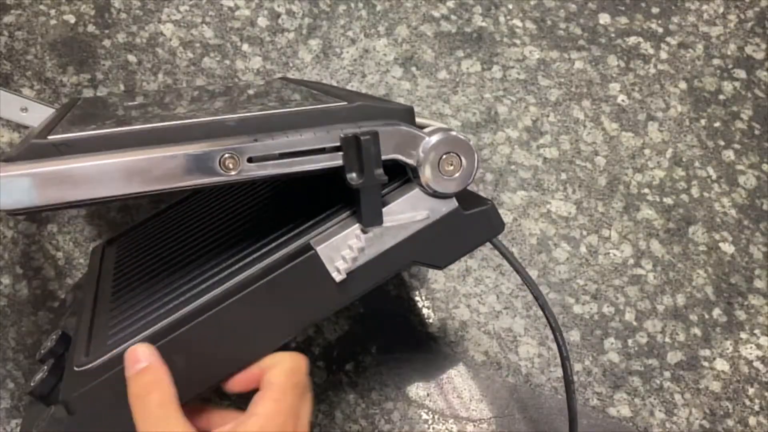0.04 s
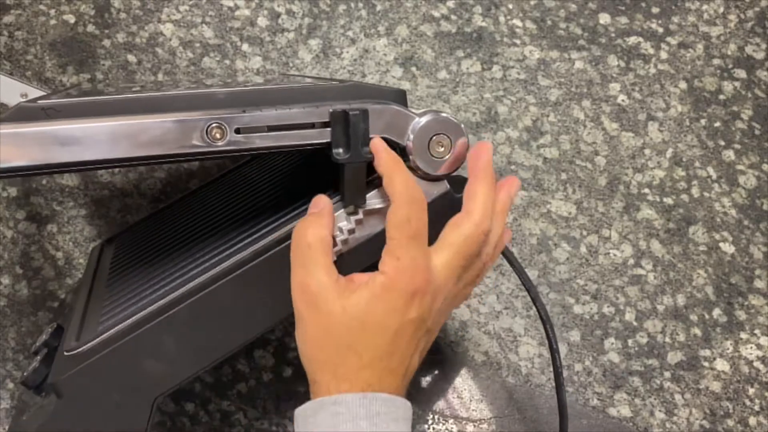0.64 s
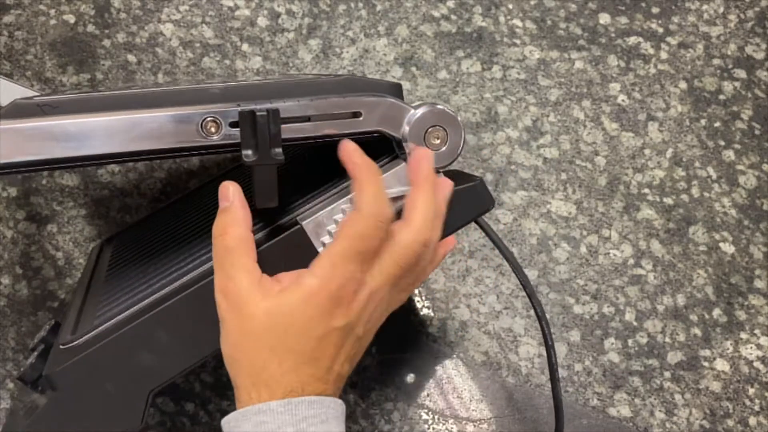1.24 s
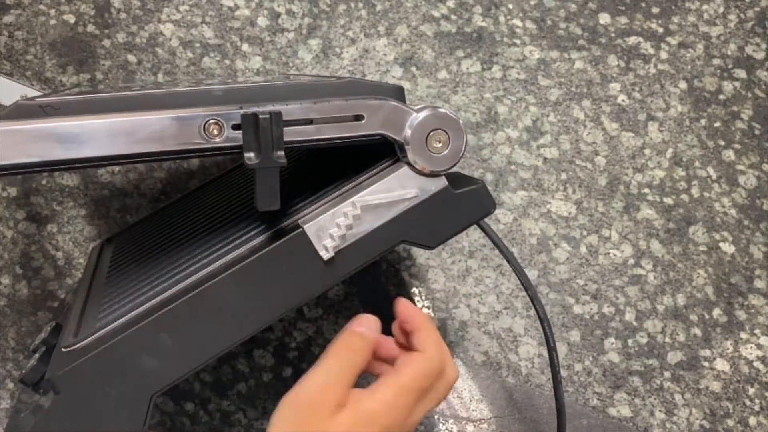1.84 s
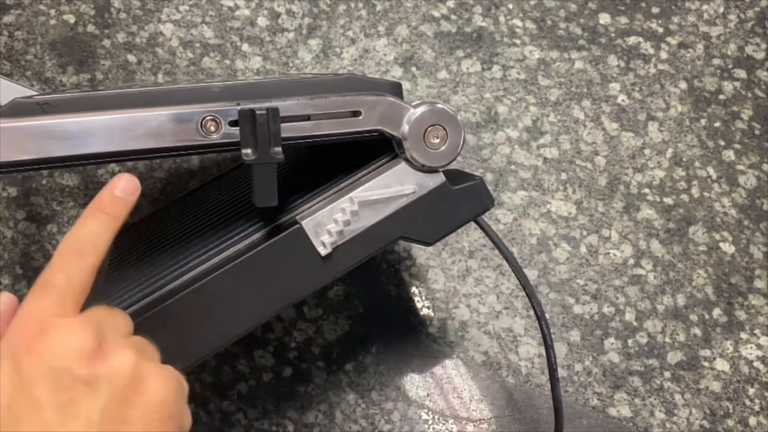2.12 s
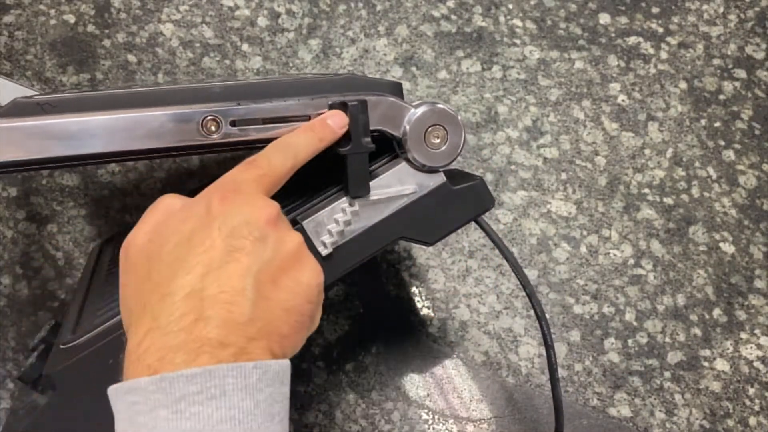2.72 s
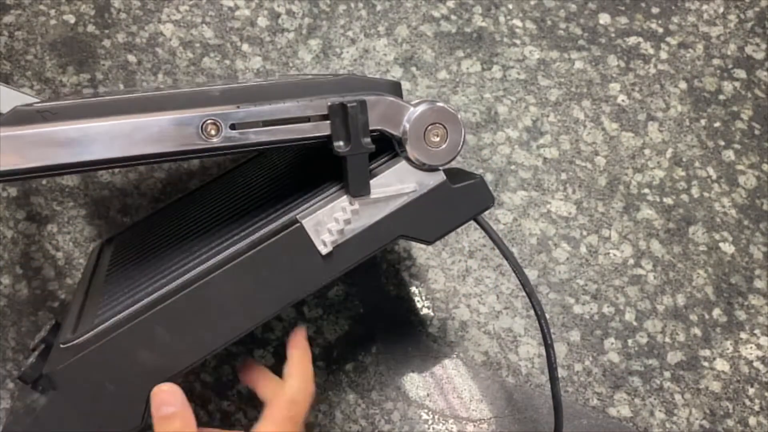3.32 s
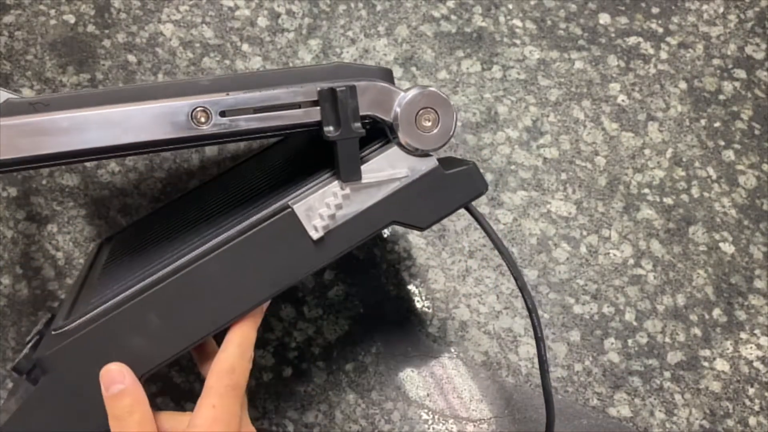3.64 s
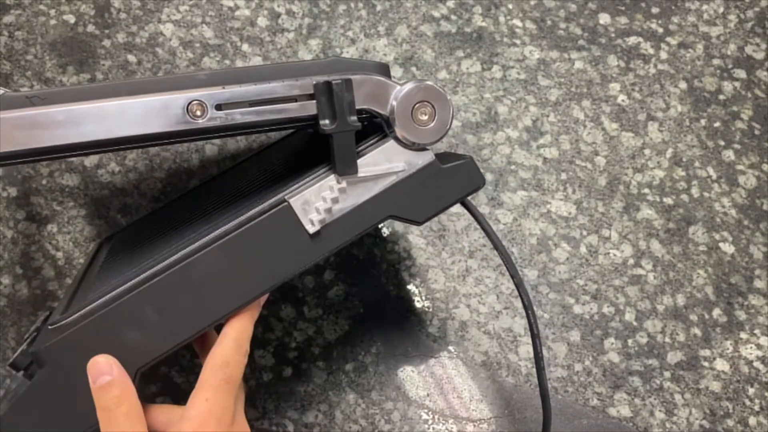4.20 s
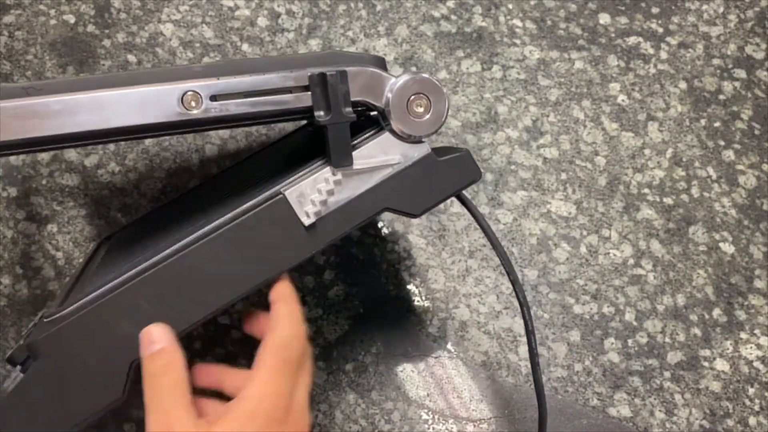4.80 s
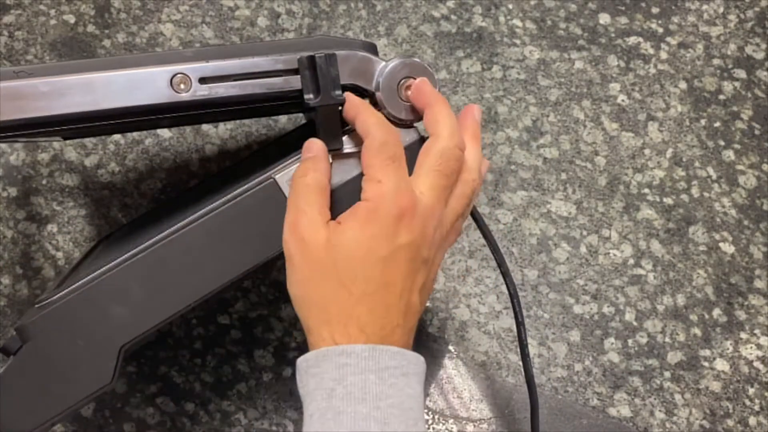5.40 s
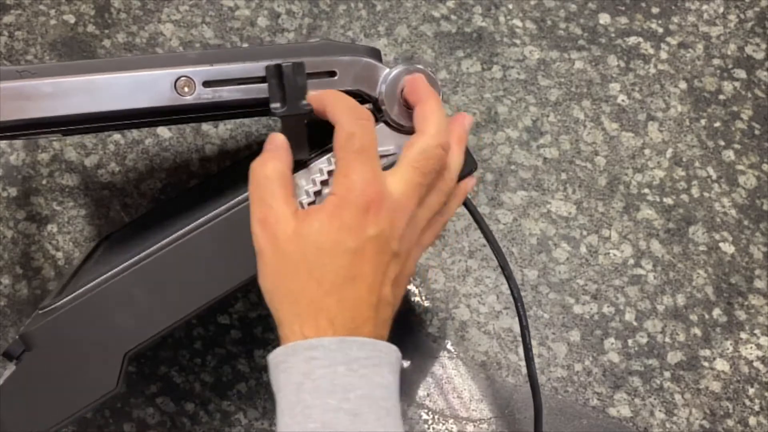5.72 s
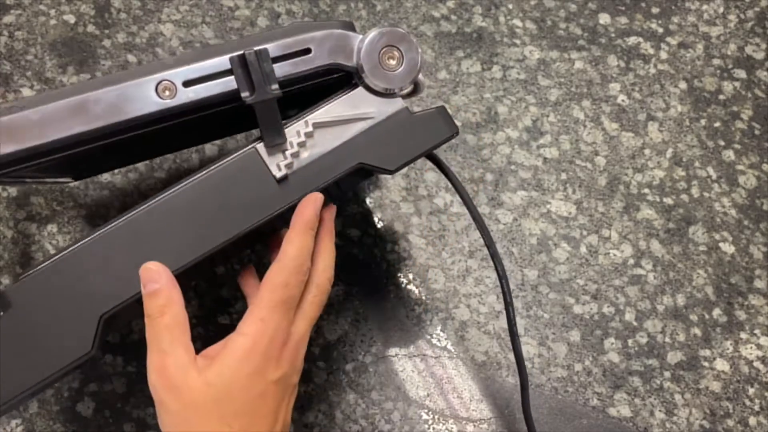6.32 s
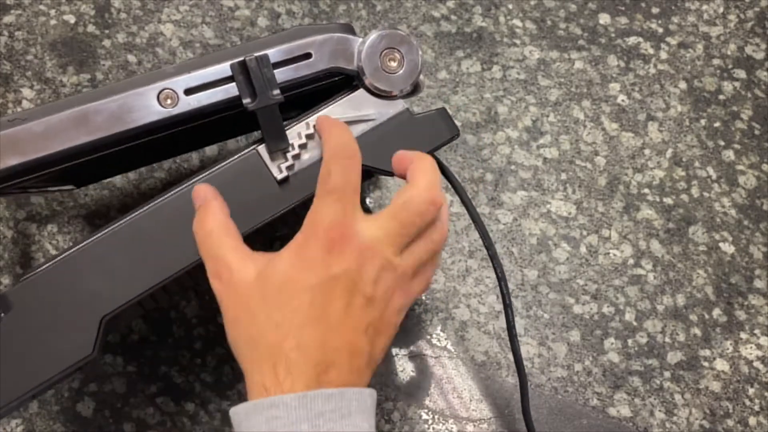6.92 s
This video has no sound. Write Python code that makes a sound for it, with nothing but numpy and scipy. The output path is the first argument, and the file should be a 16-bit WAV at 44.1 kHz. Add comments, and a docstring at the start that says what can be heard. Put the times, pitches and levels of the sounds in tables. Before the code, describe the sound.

A plastic latch slides along the notched metal arm of a countertop grill, giving three quick bursts of bright, snapping clicks, each with a brief metallic ring and hollow thud. The second burst ends in a firm knock; the third is shortest. Between them, fingers rub and tap the case and the grill bumps softly on its feet. The microphone is close, in a small kitchen with a low rumble.

```python
"""Grill latch on a kitchen countertop

Close to a two-port microphone, a plastic latch slides to and fro along the notched metal arm of a
contact grill standing on stone. Each notch gives a bright snap, the arm and the housing ring after it,
and the small kitchen answers. Fingers knock, scuff and rub on the case and the grill thuds softly on
its feet, over a low steady rumble."""
import sys
import numpy as np
from scipy import signal
from scipy.fft import rfft, irfft, next_fast_len
from scipy.io import wavfile
from scipy.ndimage import uniform_filter1d

SR = 44100
rng = np.random.default_rng(int(sys.argv[2]) if len(sys.argv) > 2 else 0)


def output_pcm(signal):
    """Save a mono or channel-first signal as 16-bit PCM at the path in sys.argv[1].

    Samples are clipped to [-1, 1] before scaling.
    """
    pcm = np.clip(np.atleast_2d(signal).T, -1, 1) * 32767
    wavfile.write(sys.argv[1], SR, np.round(pcm).astype(np.int16))


N = 306495
RING = SR // 2  # samples allowed for one ring or stroke
TOP_HZ = 16500  # upper edge of the microphone's band

# spectrum of the pawl's snap: f/Hz, relative level/dB
SNAP_COLOUR = [(600, -34), (3300, -12), (4900, -8.5), (6600, -8.5), (8500, -0.5), (10200, 0.5), (11000, -5),
               (11600, 0.5), (13500, -8), (15500, -6.5), (17000, -52)]
# spectrum of a thud in the hollow housing: f/Hz, relative level/dB
HOUSING_COLOUR = [(120, -47.5), (250, -3.5), (400, 5.5), (650, -5.5), (900, -2.5), (1400, -14),
                  (3000, -73.5)]
# clear modes of the housing: f/Hz, relative level/dB, unscaled t60/s
HOUSING_MODES = [(262, -6, .2), (313, -1, .24), (339, -2, .3), (472, -4, .18), (567, -6, .16),
                 (873, -6, .16), (1028, -7, .16)]


def latch():
    """The pawl snaps off a tooth and rattles, shaking the arm and then the housing."""
    # notches passed: t/s, snap level/dB, arm base level/dB
    notches = [(0.6652, -8, -26), (0.6953, -11.5, -22), (0.7301, -16, -29), (0.7778, -16.5, -22.5),
               (0.8285, -16.5, -27.5), (0.877, -18, -28.5), (2.3683, -13, -28), (2.4056, -16.5, -27),
               (2.443, -15.5, -27), (2.4854, -13.5, -29), (2.5295, -14.5, -25), (2.5835, -15.5, -21.5),
               (2.5902, -12, -19), (5.5785, -9.5, -29), (5.6098, -7.5, -22.5), (5.649, -18, -37),
               (6.9434, -44, -26)]
    # spectrum of the struck metal arm: f/Hz, relative level/dB
    arm_colour = [(600, -1), (1400, -4.5), (1700, -0.5), (2400, 4.5), (3700, 1), (4800, -1.5), (7000, -4),
                  (12000, -14.5), (16000, -30)]
    # clear modes of arm and lid: f/Hz, relative level/dB, unscaled t60/s
    arm_modes = [(1345, -4, .15), (1605, -6, .22), (1968, -6, .18), (2121, -6, .18), (2470, -6, .2),
                 (3484, -12, .14), (6530, -9, .3)]
    times, snap_db, arm_db = np.transpose(notches)
    housing_db = -30.5 + 0.24 * (arm_db - arm_db.mean())  # a harder hit thuds a little more
    snap = burst(times, snap_db, SNAP_COLOUR, rise_s=0.0004, t60_s=0.016)
    arm = burst(times, arm_db + 2, arm_colour, rise_s=0.0007, t60_s=0.073)
    arm_ring = ring(times, arm_db - 11, arm_modes, contact_hz=9000, t60_scale=0.38)
    housing = burst(times, housing_db, HOUSING_COLOUR, rise_s=0.008, t60_s=0.09)
    housing_ring = ring(times, housing_db - 7, HOUSING_MODES, contact_hz=3000, t60_scale=0.68)
    return snap + rattle(times, snap_db) + bending_waves(arm + arm_ring + housing + housing_ring)


def rattle(times, levels, count=4, within_s=0.017, spread_db=1.5):
    """The pawl chatters on the next tooth a few times after each snap."""
    bounces = times[:, None] + within_s * rng.random((len(times), count))
    db = levels[:, None] - 15 - spread_db * rng.uniform(-1, 1, bounces.shape)
    return burst(bounces.ravel(), db.ravel(), SNAP_COLOUR, rise_s=0.00016, t60_s=0.009)


def bending_waves(x, travel_1khz_s=0.0045):
    """Bending waves speed up with the root of frequency, so a click's lows arrive after its treble."""
    size = next_fast_len(N + RING)
    hz = np.fft.rfftfreq(size, 1 / SR)
    turns = travel_1khz_s * (2 * np.sqrt(1000 * hz) - hz * np.sqrt(1000 / TOP_HZ))  # no lag at TOP_HZ
    return irfft(rfft(x, size) * np.exp(-2j * np.pi * turns), size)[:, :N]


def knocks():
    """Fingers, loose parts and the latch at its end stops strike the shell, dull and hollow."""
    # blunt contacts: t/s, centre f/Hz, shell base level/dB, housing level/dB
    blows = [(0.5547, 600, -31, -39), (0.634, 760, -30.5, -38), (0.643, 450, -41.5, -36),
             (0.8787, 1000, -26.5, -40.5), (1.073, 1150, -26, -44.5), (2.286, 900, -25.5, -38.5),
             (2.5795, 2300, -18.5, -41), (2.593, 1550, -16.5, -24), (2.602, 540, -27.5, -32.5),
             (3.064, 1150, -38.5, -69), (4.656, 330, -54.5, -40), (5.198, 600, -57, -41),
             (5.551, 734, -24.5, -50), (5.564, 850, -23.5, -60), (5.795, 650, -51, -43),
             (6.348, 720, -31.5, -42.5), (6.687, 1200, -44, -34.5)]
    times, _, _, housing_db = np.transpose(blows)
    out = burst(times, housing_db, HOUSING_COLOUR, rise_s=0.0012, t60_s=0.11)
    out += ring(times, housing_db - 5, HOUSING_MODES, contact_hz=1600, t60_scale=0.5)
    for start, hz, db, _ in blows:
        out += burst([start], [db - 2], contact_colour(hz), rise_s=0.0011, t60_s=0.04)
        out += ring([start], [db - 9], shell_modes(hz), contact_hz=2 * hz, t60_scale=0.5)
    return out


def contact_colour(hz):
    """Spectrum of a contact: strongest at hz, which is higher for a harder touch."""
    return [(hz / 3, -11), (hz, 0), (2 * hz, -9), (4 * hz, -26), (10 * hz, -48)]


def shell_modes(hz):
    """A contact centred at hz wakes the shell's nearby modes most."""
    # plastic shell: f/Hz, relative level/dB, unscaled t60/s
    modes = [(860, -1, .11), (1136, -2, .1), (1350, -1, .12), (1750, -4, .11), (2200, -5, .1)]
    return [(f, db + at(contact_colour(hz), f), t60) for f, db, t60 in modes]


def ticks():
    """Nails and the loose latch touch the case: short and dry."""
    # light contacts: t/s, centre f/Hz, level/dB
    touches = [(0.176, 2500, -35), (3.265, 1300, -35), (5.495, 4000, -34.5), (5.527, 10170, -34.5),
               (5.565, 2500, -32), (6.683, 2370, -33.5)]
    return sum(burst([start], [db], contact_colour(hz), rise_s=0.0008, t60_s=0.022)
               for start, hz, db in touches)


def bumps(sag=0.12):
    """The grill shifts on its rubber feet: each push swells a brief, juddering, sagging housing note."""
    # soft thuds: t/s, length/s, f/Hz, level/dB
    pushes = [(3.256, .02, 335, -23.5), (3.283, .046, 330, -32.5), (4.468, .04, 275, -37.5)]
    out = np.zeros((2, N))
    for start, length, hz, db in pushes:
        along = np.linspace(0, 1, int(length * SR))
        judder = 0.16 * unit(uniform_filter1d(rng.standard_normal(len(along)), size=150))
        phase = 2 * np.pi * np.cumsum(hz * (1 + judder - sag * (along - 0.5))) / SR
        swell = np.sin(np.pi * along)
        add(out, start, amp(db) * (swell * np.sin(phase))[None])
    return out


def creaks(slips_per_s=220, jitter=0.26, scatter_db=3, build_db=6):
    """Skin and plastic stick and slip ever harder; each slip kicks the finger-damped shell."""
    # scuffs and creaks under load: t/s, length/s, level at the end/dB, centre f/Hz
    scuffs = [(0.178, .035, -47, 600), (0.532, .025, -42, 2100), (2.279, .014, -38, 1700),
              (5.141, .03, -39, 4000), (6.331, .018, -43, 1100), (6.585, .035, -48, 700),
              (6.726, .033, -34.5, 1200)]
    out = np.zeros((2, N))
    for start, length, db, hz in scuffs:
        gap_chance, level_chance = rng.standard_normal((24, 2)).T
        offsets = (np.cumsum(1 + jitter * gap_chance) - 1) / slips_per_s
        levels = db + scatter_db * level_chance + build_db * (offsets / length - 1)
        inside = offsets < length
        times, levels = start + offsets[inside], levels[inside]
        out += burst(times, levels, contact_colour(hz), rise_s=0.0006, t60_s=0.016)
        out += ring(times, levels - 7, shell_modes(hz), contact_hz=2 * hz, t60_scale=0.4)
    return out


def rubs(flick_hz=9100, octave_s=0.2):
    """Strokes of the hand swell and fade on the case: a quick flick is bright, a slow drag dull."""
    # skin and plastic sliding: t/s, length/s, level/dB
    strokes = [(0.163, 0.13, -52), (0.597, 0.3, -39), (1.367, 0.073, -56), (2.041, 0.22, -59.5),
               (2.929, 0.31, -59), (3.407, 0.052, -50.5), (3.748, 0.036, -60), (4.597, 0.21, -54.5),
               (5.051, 0.118, -59.5), (5.125, 0.15, -51), (5.276, 0.044, -56), (5.516, 0.21, -37.5),
               (6.016, 0.06, -54), (6.595, 0.147, -53), (6.669, 0.082, -46.5), (6.741, 0.066, -42)]
    out, t = np.zeros((2, N)), np.arange(RING) / SR
    for start, length, db in strokes:
        centre_hz = flick_hz * 0.5 ** (length / octave_s)
        swell = np.interp(t, [0, length / 4, length], [0, 1, 0])
        add(out, start, amp(db) * swell * friction(centre_hz, RING, grain_db=4))
    return out


def handling(centre_hz=1250):
    """Palm and sleeve keep brushing the case in soft, uneven swells."""
    # trend of the brushing: t/s, level/dB
    trend = [(0.1, -59.5), (0.45, -66.5), (1.25, -83.5), (2.0, -66), (3.401, -72.5), (4.15, -65),
             (4.5, -79.5), (4.75, -65.5), (5.25, -60), (5.42, -70.5), (5.95, -58.5), (6.3, -68.5),
             (6.5, -67.5)]
    db = np.interp(np.arange(N) / SR, *np.transpose(trend)) + 2 * waver(per_s=11)
    return amp(db) * friction(centre_hz, N, grain_db=3)


def friction(hz, size, grain_db):
    """Sliding contact catches and slips in tiny grains, about a millisecond each."""
    slips = amp(grain_db * rng.standard_normal(size // 50 + 1))
    grains = unit(uniform_filter1d(np.repeat(slips, 50)[:size], size=30))
    return grains * noise([(hz / 16, -22), (hz / 3, -5), (hz, 0), (3 * hz, -11), (6 * hz, -26)], size)


def kitchen(x, gap_s=0.0036, build_s=0.0083):
    """Countertop and cupboards return a dense tail whose treble dies first."""
    # decay of the room: f/Hz, t60/s
    room_t60 = [(200, .31), (2500, .29), (6000, .23), (11000, .23), (16000, .1)]
    t, hz = np.arange(SR) / SR, np.fft.rfftfreq(SR, 1 / SR)
    echoes = rfft(noise([(100, 9), (400, 5.5), (2500, 3), (6000, 1.5), (10000, -0.5), (16000, 6)], SR))
    octaves = np.geomspace(125, 16000, 8)
    tail = np.zeros((2, SR))
    for centre, weights in zip(octaves, np.eye(len(octaves))):
        band = irfft(echoes * at(np.c_[octaves, weights], hz), SR)
        tail += band * decay(t, at(room_t60, centre))
    tail *= np.clip((t - gap_s) / build_s, 0, 1)
    return signal.fftconvolve(x.mean(axis=0)[None], unit(tail) / np.sqrt(SR), axes=1)[:, :N]


def room_tone(waver_db=1.5, hum_hz=200):
    """A throbbing low rumble with a faint hum, moving air and a thin high hiss."""
    # spectrum of the rumble: f/Hz, relative level/dB
    rumble_colour = [(20, -51), (38, -25.5), (52, 3.5), (68, -10), (84, 7.5), (91, 11), (108, 5.5),
                     (128, -25), (220, -58.5)]
    # slow trend of the rumble: t/s, level/dB
    trend = [(0.1, -30), (1.1, -33), (1.6, -30.5), (2.7, -34), (3.3, -27.5), (4.3, -30), (4.6, -35),
             (5.25, -30.5), (5.95, -38.5), (6.45, -36), (6.9, -43.5)]
    # spectrum of air and hiss: f/Hz, relative level/dB
    air_colour = [(60, -10), (150, -1), (230, -5), (320, -13), (450, -21), (690, -16), (830, -28),
                  (1150, -34), (1600, -44), (4000, -53), (12000, -54), (15300, -30), (16300, -50)]
    t = np.arange(N) / SR
    rumble = noise(rumble_colour, N)
    # even out the slow swings and keep the quick beating
    rumble /= np.sqrt(uniform_filter1d(np.mean(rumble ** 2, axis=0), size=SR // 5))
    strength = amp(np.interp(t, *np.transpose(trend)) + waver_db * waver(per_s=5))
    hum = amp(-50) * np.sin(2 * np.pi * hum_hz * t)
    air = amp(-47) * noise(air_colour, N)
    fade_in = np.minimum(t / 0.01, 1)
    return (rumble * strength + hum + air) * fade_in


def burst(times, levels, colour, rise_s, t60_s, sameness=0.12):
    """Blows on damped modes too crowded to tell apart; part of the response is the same each time."""
    out, t = np.zeros((2, N)), np.arange(RING // 2) / SR
    envelope = (1 - np.exp(-(t / rise_s) ** 2)) * decay(t, t60_s)
    common = np.sqrt(sameness) * noise(colour, len(t))
    for start, db in zip(times, levels):
        fresh = np.sqrt(1 - sameness) * noise(colour, len(t))
        add(out, start, amp(db) * envelope * (common + fresh))
    return out


def ring(times, levels, modes, contact_hz, t60_scale, spot_db=4, rise_s=0.0051):
    """Clear modes, struck at a new spot each blow; a soft contact barely wakes those above contact_hz."""
    out, t = np.zeros((2, N)), np.arange(RING) / SR
    hz, mode_db, t60 = np.transpose(modes)[:, :, None]
    strength = amp(mode_db) / (1 + (hz / contact_hz) ** 4)
    envelope = (1 - np.exp(-t / rise_s)) * decay(t, t60 * t60_scale)
    waves = strength * envelope * np.exp(2j * np.pi * hz * t)
    for start, db in zip(times, levels):
        gains = amp(db + spot_db * rng.uniform(-1, 1, hz.shape))
        phases = np.exp(2j * np.pi * rng.random(hz.shape))
        add(out, start, (gains * phases * waves).imag.sum(axis=0)[None])
    return out


def noise(colour, size):
    """Coloured noise at both microphone ports, rms 1, partly alike."""
    # likeness of the ports: f/Hz, correlation/0-1
    likeness = [(100, .97), (300, .9), (700, .65), (3000, .6), (6500, .6), (9000, .85)]
    hz = np.fft.rfftfreq(size, 1 / SR)
    alike = at(likeness, hz)
    spectra = rfft(rng.standard_normal((2, size))) * amp(at(colour, hz))
    mid, side = spectra * np.sqrt([1 + alike, 1 - alike])
    return unit(irfft([mid + side, mid - side], size))


def waver(per_s):
    """Random values joined by straight lines, spread near 1."""
    return 1.2 * np.interp(np.arange(N) / SR * per_s, np.arange(100), rng.standard_normal(100))


def decay(t, t60_s):
    """Fall by 60 dB every t60_s."""
    return np.exp(-np.log(1000) * t / t60_s)


def amp(db):
    """Decibels to gain."""
    return 10 ** (np.asarray(db) / 20)


def at(table, hz):
    """Read (f/Hz, value) points on a log-frequency axis."""
    f, value = np.transpose(table)
    return np.interp(np.log(np.maximum(hz, 1)), np.log(f), value)


def unit(x):
    """Scale to rms 1."""
    return x / np.sqrt(np.mean(x ** 2))


def add(out, start_s, x):
    """Mix x into out from start_s on."""
    i = max(int(start_s * SR), 0)
    out[:, i:i + x.shape[1]] += x[:, :max(N - i, 0)]


def scene():
    """The grill close to the microphone, the kitchen's echo behind it and room tone underneath."""
    grill = latch() + knocks() + ticks() + bumps() + creaks() + rubs() + handling()
    return grill + amp(-8.8) * kitchen(grill) + room_tone()


def record(dry):
    """Two microphone ports on a phone body differ in phase and level; the top is cut."""
    # phase between the ports: f/Hz, left lead/rad
    port_phase = [(340, -.5), (700, 1.2), (1800, .7), (2900, 1.1), (7000, -.2), (8300, -3.3), (11600, -7),
                  (15500, -12.6)]
    # balance of the ports: f/Hz, left minus right/dB
    port_balance = [(100, .8), (300, -1), (650, -3.5), (1300, 1.5), (2400, 3.5), (4400, 2.5), (8000, .3)]
    size = next_fast_len(N + RING)
    hz = np.fft.rfftfreq(size, 1 / SR)
    left = amp(at(port_balance, hz) / 2) * np.exp(0.5j * at(port_phase, hz))
    ports = irfft(rfft(dry, size) * np.array([left, 1 / left]), size)[:, :N]
    return signal.sosfilt(signal.ellip(8, 0.2, 70, TOP_HZ, fs=SR, output="sos"), ports)


dry = scene()
out = record(dry)
output_pcm(out)
```